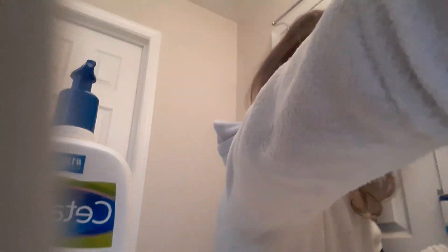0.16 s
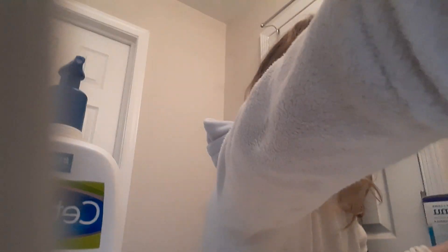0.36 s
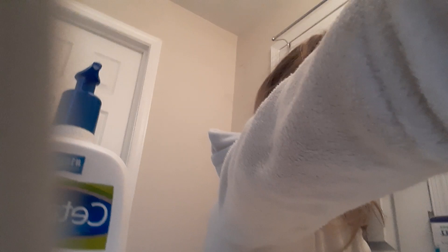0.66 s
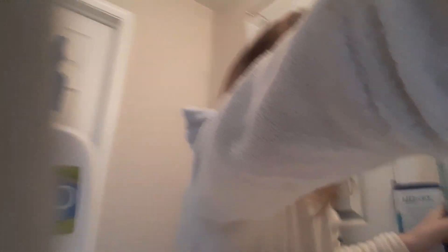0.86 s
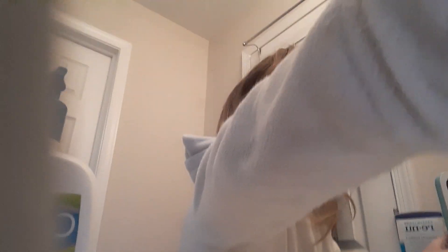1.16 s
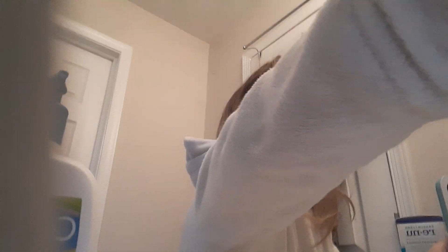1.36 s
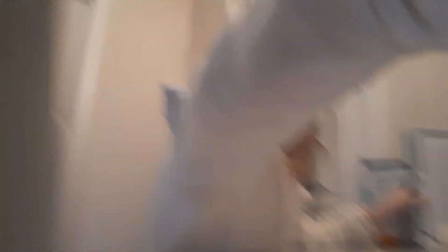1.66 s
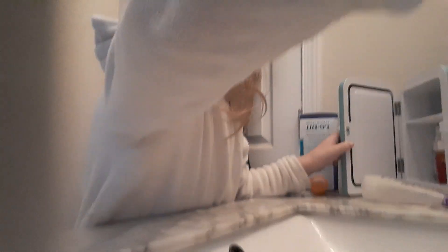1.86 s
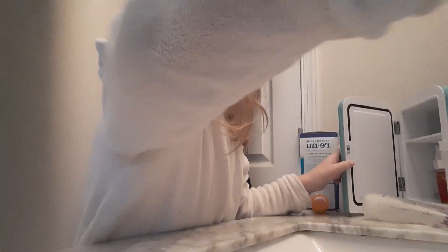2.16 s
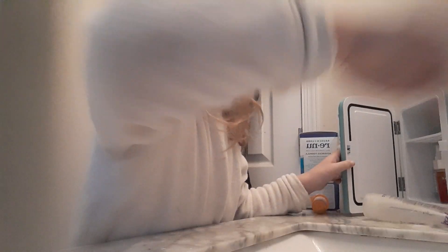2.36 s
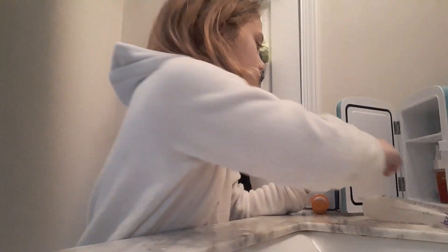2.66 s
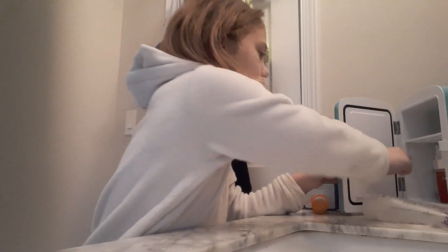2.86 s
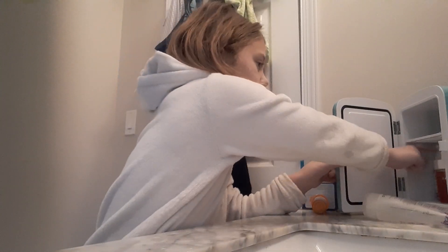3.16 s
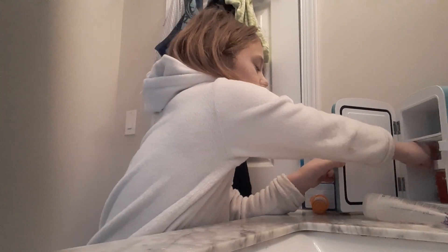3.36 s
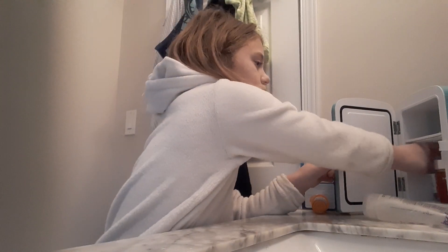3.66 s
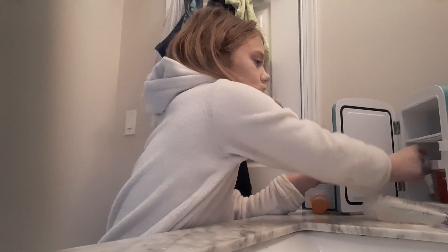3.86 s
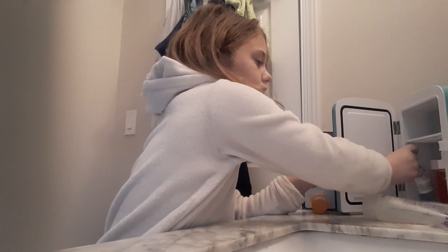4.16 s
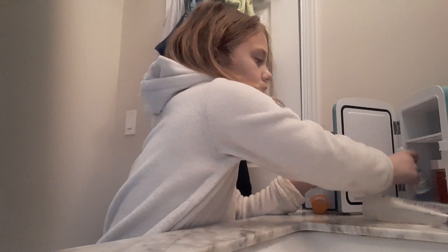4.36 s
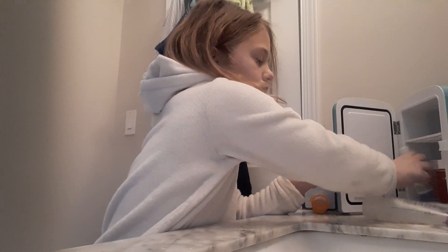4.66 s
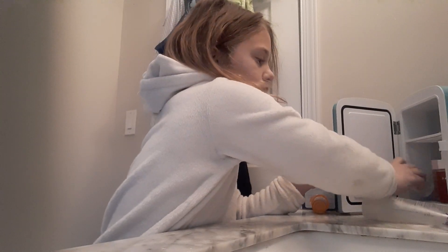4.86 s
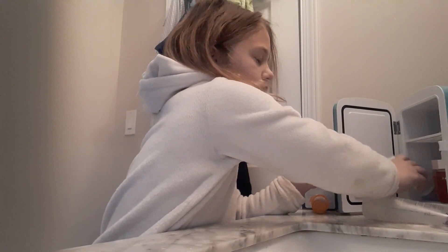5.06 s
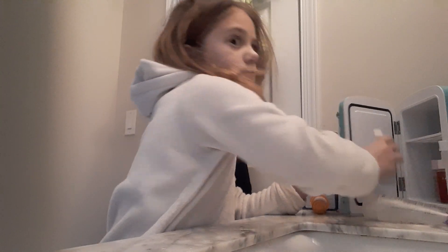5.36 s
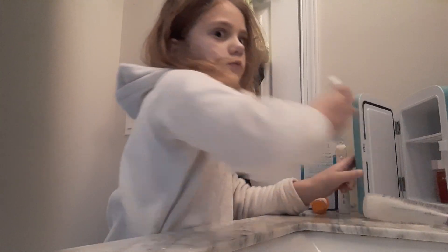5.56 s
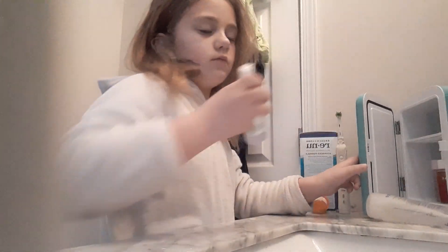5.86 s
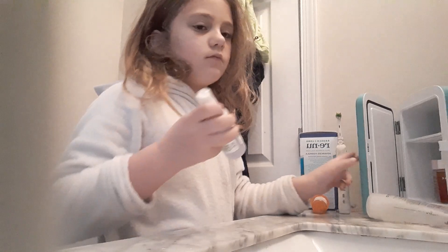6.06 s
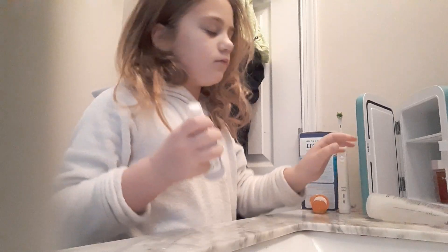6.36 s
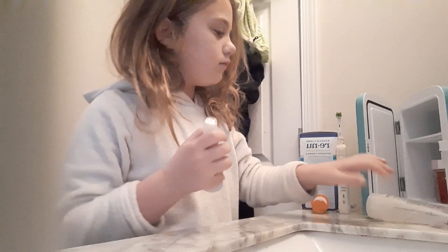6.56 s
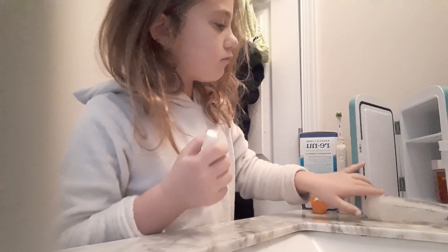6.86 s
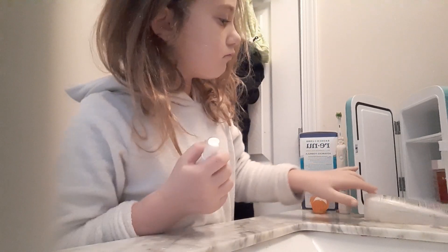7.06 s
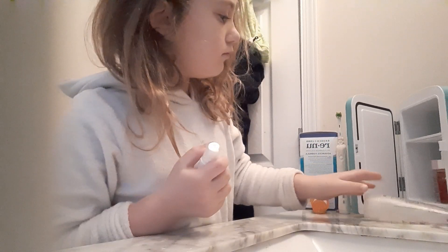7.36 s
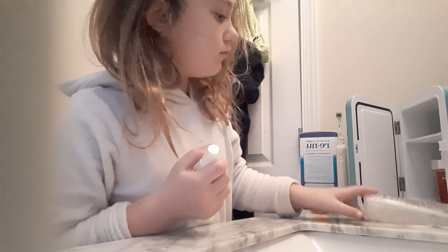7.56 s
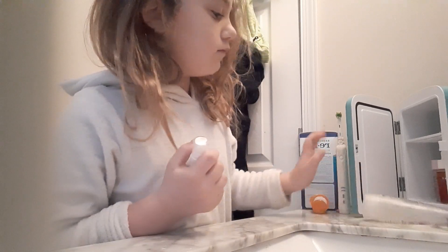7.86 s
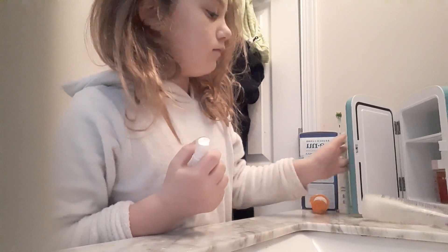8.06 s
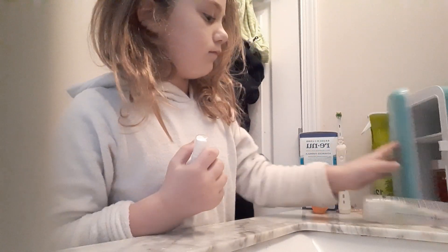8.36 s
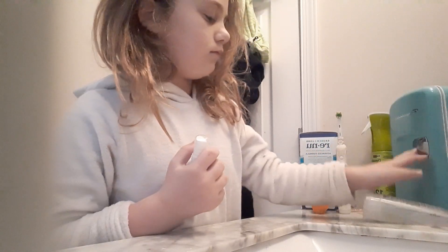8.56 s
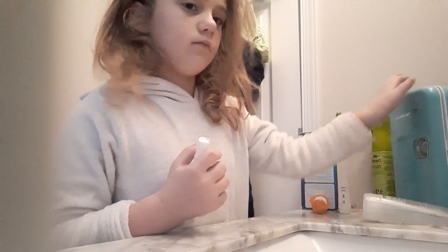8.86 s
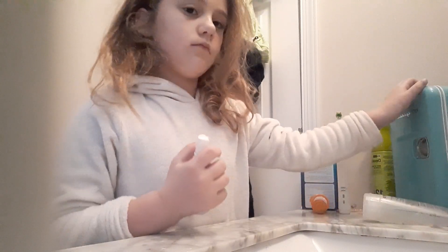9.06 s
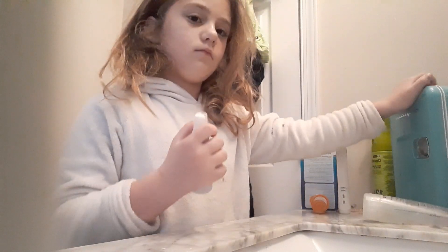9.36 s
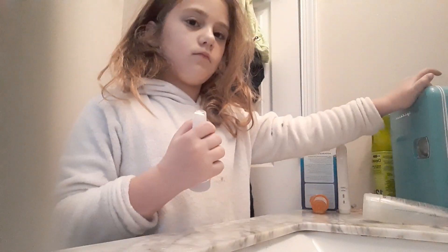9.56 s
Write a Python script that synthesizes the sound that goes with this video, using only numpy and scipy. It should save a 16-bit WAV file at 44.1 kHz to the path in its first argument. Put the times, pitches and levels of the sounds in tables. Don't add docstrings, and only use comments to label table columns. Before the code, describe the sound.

Close, dry handling clicks and skin rubs open the scene, ended by a sharp crack of the device on stone, by far the loudest sound. Then hollow plastic knocks come in separate clusters: a jar groped for, a tall bottle tipping, bottles pulled free with a snap. Quiet taps and gentle rocking lead to a low door thump and light lid taps, with short bright room reverberation and low fan noise.

```python
import sys
import numpy as np
from scipy import signal
from scipy.fft import rfft, irfft
from scipy.io import wavfile

SR = 44100
rng = np.random.default_rng(int(sys.argv[2]) if len(sys.argv) > 2 else 0)


def waveform_to_disk(signal):
    frames = np.transpose(np.atleast_2d(signal))
    scaled = np.clip(frames, -1, 1) * 32767
    samples = np.round(scaled).astype(np.int16)
    wavfile.write(sys.argv[1], SR, samples)


def elevation(decibels):
    levels = np.asarray(decibels, float)
    return 10 ** (levels / 20)


N = 428652

# (time [s], thud level [dB], thud pitch [Hz], knock level [dB], crack level [dB])
JAR_BLOWS = [(3.251, -37, 404, -52, -82), (3.29, -12.5, 434, -32, -55.5), (3.316, -36, 457, -43, -70),
             (3.333, -32, 420, -44, -69), (3.345, -34, 480, -36, -66), (3.356, -36, 453, -38, -66),
             (3.366, -30, 500, -43, -69), (3.375, -29, 420, -35.5, -56.5), (3.385, -38, 480, -44, -67),
             (3.395, -33, 405, -52, -75), (3.408, -17.5, 439, -41.5, -61.5), (3.519, -20, 433, -37, -61.5),
             (3.549, -32, 448, -45, -72), (3.578, -35, 440, -49, -81), (3.645, -42, 414, -51.5, -91),
             (3.69, -46, 399.5, -53, -82), (4.378, -22, 240, -38, -76), (4.428, -32, 338, -46.5, -83)]
PULL_BLOWS = [
    (5.35, -48, 298, -77, -92),
    (5.4355, -23, 447, -28, -50),
    (5.447, -34, 348, -31.5, -47),
    (5.459, -19, 452, -30, -47),
    (5.477, -15, 300, -17, -40),
    (5.488, -16, 428, -19, -42),
    (5.497, -20, 454, -29, -43),
    (5.509, -25.5, 454, -23.5, -57),
    (5.517, -20, 334, -32, -60),
    (5.539, -24.5, 221, -48, -60.5),
]
TIP_BLOWS = [
    (4.845, -18.5, 300, -34.5, -43),
    (4.869, -29, 280, -34.5, -52.5),
    (4.888, -21, 240, -32, -50),
    (4.897, -18, 282, -33, -48.5),
    (4.914, -27.5, 340, -35.5, -52),
    (4.94, -36, 260, -46, -62),
    (4.985, -36.5, 233, -52, -70),
]
SNAP_BLOWS = [
    (5.5665, -12.5, 370, -17.5, -27),
    (5.578, -18, 420, -22, -47),
    (5.590, -34, 387, -40, -55),
    (5.60, -29, 150, -46, -50),
    (5.609, -24.5, 363, -34, -49),
    (5.639, -26, 370, -40, -57),
    (5.679, -36, 451, -40.5, -69),
]
BUMP_BLOWS = [
    (8.205, -26, 420, -38, -52.5),
    (8.214, -23, 400, -20, -46.5),
    (8.223, -17.5, 398, -26.5, -61),
    (8.234, -24.5, 395, -44, -53),
    (8.268, -27, 348, -37, -56),
    (8.285, -29, 420, -52, -72),
    (8.305, -29, 386, -37, -68),
    (8.335, -47, 340, -51, -71),
    (8.40, -56, 402, -56, -65),
]
DOOR_BLOWS = [(8.496, -17, 250, -28, -35), (8.501, -11.5, 135, -27.5, -59), (8.525, -19.5, 324, -39, -55),
              (8.543, -17.5, 300, -26, -42.5), (8.551, -21, 154, -32, -67), (8.568, -20, 140, -28, -61),
              (8.6, -29, 250, -39, -71), (8.657, -50, 300, -43, -72), (8.71, -39, 420, -50, -69),
              (8.94, -46, 220, -58.5, -73), (8.953, -28, 137.5, -40, -55), (8.973, -31, 290, -52, -78),
              (9.075, -43, 275, -43, -86)]
LIGHT_BLOWS = [
    (6.126, -48, 459, -48.5, -79),
    (6.171, -28.5, 307.5, -64, -77),
    (6.9375, -13, 397, -29, -50.5),
    (6.97, -24.5, 321, -38, -60),
    (7.136, -32, 376, -50.5, -79),
    (7.509, -27.5, 372, -49.5, -70),
    (7.751, -24.5, 388, -41, -59),
]
LID_BLOWS = [
    (9.251, -47, 285, -35.5, -59.5),
    (9.331, -44, 290, -49, -64.5),
    (9.375, -32.5, 300, -37, -51.5),
    (9.387, -37, 656, -50, -70),
    (9.409, -44, 600, -60, -60),
    (9.453, -42, 298, -43, -62.5),
    (9.458, -54, 500, -42.5, -75),
    (9.482, -53, 500, -62, -77),
    (9.701, -26.5, 281, -30.5, -62.5),
]
TOUCH_BLOWS = [(2.512, -45.5, 500, -45, -82), (2.521, -41, 449, -54, -95), (2.533, -55, 398, -56.5, -82),
               (3.041, -40.5, 314, -44.5, -91), (3.7795, -31, 480, -38, -98), (3.786, -36, 324, -47, -96),
               (3.792, -39, 404, -60, -98), (3.80, -43, 452, -53, -100), (3.818, -43, 350, -52, -100),
               (3.838, -47, 552, -40, -91), (3.848, -45, 450, -52, -90), (3.878, -49, 319, -47, -94),
               (3.897, -56, 400, -52, -94), (4.21, -35, 212, -48, -103), (4.235, -31, 423, -50, -89)]

# (frequency [Hz], level [dB], decay time t60 [s]); first the jar
JAR_MODES = [(219.4, -1, 0.14), (300, -4, 0.13), (338, -1.5, 0.12), (428, -2, 0.06), (500, -11, 0.096),
             (563, 3.5, 0.032), (693, 2.5, 0.066), (1140, 0.5, 0.023), (1820, -23, .025),
             (2350, -28, 0.029)]
CABINET_MODES = [(218.4, 8, 0.227), (241.4, -5.5, 0.47), (318.5, -2.5, 0.25), (342.5, -3.5, 0.29),
                 (397, -21, 0.085), (420, 8, 0.086), (462.3, -3, 0.17), (598, -12.5, 0.19),
                 (707, -1.5, 0.11), (770, -0.5, 0.011), (960, -6.5, 0.024), (1120, -17, 0.12)]
TIP_MODES = [(228.4, -1, 0.16), (234, -1.5, 0.43), (319, -1.5, 0.119), (338, 0.5, 0.14), (442, 3.5, 0.089),
             (704, -4, 0.088), (867, -19, 0.045), (1306, -4.5, 0.03), (2690, -13, 0.021)]
BUMP_MODES = [(250, -2, 0.28), (342, -11.5, 0.16), (406, 3, 0.061), (480, -20, 0.096), (716, -6, 0.071),
              (970, -20, 0.037), (1880, -21, 0.02)]
DOOR_MODES = [(135, -12, 0.082), (160, -15, 0.08), (280, -7.5, 0.18), (322, 6.5, 0.051), (420, -5, 0.1),
              (495, -2.5, 0.14), (564, -5, 0.071), (668, -9.5, 0.058), (1100, -33, 0.044)]
TUBE_MODES = [(242, -12, 0.21), (318, 1.5, 0.052), (344, 6, 0.085), (455, -7, 0.081), (678, -10.5, 0.11),
              (872, -3.5, 0.031), (1390, -21, 0.025), (2070, -3.5, 0.01)]
LID_MODES = [(290, 1.5, 0.084), (340, 3, .1), (694, -17, 0.05), (1047, 6, 0.027), (2284, 4.5, 0.017),
             (3840, -8.5, 0.011)]
TOUCH_MODES = [(300, 9, 0.063), (424, 4, 0.069), (600, -1.5, 0.042), (1100, -9, 0.038), (1450, -34, .03)]

# (start [s], hold [s], scuff
# level [dB], hiss relative to scuff [dB])
SLIDES = [(1.738, 0.057, -44.5, -12), (3.016, 0.13, -64.5, -8), (3.274, 0.13, -45, -19.5),
          (3.453, 0.29, -70.5, -9), (3.76, 0.023, -69, -8), (3.897, 0.15, -65.5, -13),
          (4.197, .02, -58, -20), (4.351, 0.058, -67.5, -5.5), (5.554, .04, -47, -2),
          (4.927, 0.13, -60, -11), (5.085, 0.057, -71, 5), (5.152, 0.042, -61.5, -26),
          (8.211, 0.099, -44, -23), (8.337, 0.08, -63, -2), (8.486, 0.033, -38.5, -13.5),
          (8.924, 0.037, -46, -21), (9.041, 0.049, -58.5, -19), (9.273, .05, -56, -19),
          (9.36, 0.047, -49, -19), (9.518, 0.17, -83.5, -30.5)]
# (time [s], level [dB], pitch [Hz])
ROCKS = [(5.808, -43.5, 297), (5.987, -43.5, 290), (6.332, -42, 296.7), (6.491, -50, 323),
         (6.613, -42.5, 303), (6.749, -56, 330), (6.868, -46.5, 300), (7.267, -45, 320), (7.353, -51, 340),
         (7.427, -49, 324), (9.322, -46, 290), (9.437, -43, 300), (9.517, -44, 290), (9.623, -42, 280)]
# (time [s], level [dB], pitch [Hz])
BOOMS = [(1.7265, -22, 58.6), (4.85, -51.5, 77), (5.44, -45, 90), (5.572, -30, 101), (5.6, -43, 82.2),
         (6.94, -53.5, 60), (8.222, -42, 80.5), (8.25, -35.5, 76), (8.955, -47, 55), (9.1, -45, 50.2),
         (9.38, -57, 55)]
# (time [s], click level [dB], knock level [dB], length [ms])
TAPS = [(0.0014, -52, -47, 7.2), (0.0155, -32, -45, 2.4), (0.0225, -26, -22.5, 0.81),
        (0.027, -46, -45, 3.2), (0.036, -37, -46, 4.6), (0.042, -47, -59, 1.8), (0.2964, -42.5, -46.5, 2.5),
        (0.337, -57, -62, 2.4), (0.5, -56, -69, 1.4), (0.767, -57, -67, 2.1), (0.8703, -27, -38, 1.5),
        (0.878, -28, -26.5, 0.81), (0.882, -41, -49, 2.9), (0.893, -55, -52, 3.3), (0.904, -51, -58, 1.5),
        (0.911, -43, -42, 1.4), (0.962, -64, -56, 1.5), (0.974, -67, -66, 1.5), (0.994, -57, -68, 2),
        (1.2081, -57, -53.5, .88), (1.2888, -48, -49, 1.04), (1.358, -65, -51.5, 2.44),
        (1.377, -33, -44.5, 1.2), (1.409, -53, -48.5, 1.1), (1.445, -54.5, -52, 3),
        (1.505, -51.5, -54.5, 2.2), (1.5654, -56, -43.5, 1.9), (1.6326, -49.5, -59.5, 2.3),
        (1.6563, -46, -55.5, 1.9), (1.836, -42, -55, 1.5), (1.8487, -28, -39.5, 1.8),
        (1.854, -44, -47.5, 3.2), (1.861, -32.5, -35.5, 1.45), (1.92, -51, -52.5, 1.4),
        (2.0878, -57, -53, 2.9), (2.0957, -49, -61, 4.2), (2.1016, -59, -44, 4.4)]
LANDING = [(1.688, -52.5, -57, 2.3), (1.705, -43.5, -57, 2.6), (1.7135, -48, -63, 1.2), (1.722, 1, -12, 1),
           (1.728, -19, -34, 1.4), (1.7306, -25.5, -33.5, 7.2), (1.7346, -26, -36, 1.3),
           (1.7592, -14, -24.5, 0.8), (1.7602, -3, -26.5, 1.4), (1.7622, -12, -30.5, 1.1),
           (1.7641, -12.5, -32, 1.1), (1.768, -29, -39, 8.5)]
# (level [dB], frequency [Hz], t60 [s])
PORT_PING = (-1, 8800, .006)
# (time [s], level [dB], length [ms])
JOLTS = [(.0014, -43, 0.91), (0.014, -47.5, 1.2), (0.0223, -38, 1.2), (0.0352, -53, 1.2),
         (0.8698, -52.5, 3.1), (0.8811, -43.5, 3.3), (0.899, -61, 4), (0.915, -55, 4.8),
         (1.7227, -11.5, 0.56), (1.7613, -25.5, 0.59), (1.8473, -54.5, 1.7), (2.096, -67, 0.94),
         (3.29, -51, 1), (4.846, -58, 1.2), (5.568, -47, 1.5)]
# (start [s], hold [s], hiss level [dB], dull part relative to hiss [dB])
RUBS = [(-.03, 0.023, -44, -7), (0.106, .16, -60.5, 6), (0.252, 0.031, -65, -8), (0.562, 0.12, -64.5, 0),
        (0.717, 0.26, -67, -8), (0.997, 0.42, -71, -1), (1.285, 0.13, -67.5, -2.5),
        (1.447, 0.18, -63.5, -7), (1.63, 0.09, -60.5, -6), (1.76, 0.155, -80, 8.5), (2.06, 0.019, -73, 12)]

# (frequency [Hz], level [dB per Hz])
CRACK_COLOUR = [(2000, -32), (3200, -6.5), (4600, -2), (7000, -8.5), (9000, 8.5), (11000, -1), (15500, -3),
                (16500, -42)]
PORT_COLOUR = [(1760, -30), (2800, -14), (3340, 3), (4000, -6.5), (5700, -7), (7060, -13), (8870, 2.5),
               (10500, -0.5), (14100, -4.5), (15900, -14.5), (16500, -41)]
STONE_COLOUR = [(1300, -19), (2000, -12.5), (6000, -9.5), (7400, -7), (8700, -1), (10200, -14),
                (15500, -9.5), (16500, -40)]
# (band centre [Hz], level [dB], t60 [s])
ROOM_BANDS = [(140, -11, 0.23), (324, -10, 0.34), (533, -8, 0.34), (750, -9, .34), (1270, -11, 0.14),
              (1860, -8.5, 0.43), (2550, -12, 0.38), (3376, -4.5, .33), (4773, -15, 0.57),
              (6040, -0.5, 0.36), (9030, -20, 0.49), (12730, -5, 0.26)]
# (frequency [Hz], level [dB per Hz])
AIR_COLOUR = [(20, -49), (50, -21.5), (107, -7.5), (197, -13), (245, -9.5), (368, -13.5), (440, -7.5),
              (660, -13.5), (760, -9.5), (950, -17), (1290, -22), (2200, -31.5), (2700, -39), (4000, -56)]
# (frequency [Hz], rms level [dB])
FAN_TONES = [(118.4, -74), (253.0, -73), (339.1, -73.5), (473.7, -72.5), (576.0, -78), (764.4, -69),
             (1077, -90), (1270, -75.5), (1453, -83.5), (1890, -86)]
# (time [s], level [dB])
FAN_COURSE = [(0, -50.5), (.4, -54.5), (1.3, -55), (1.75, -52.5), (1.95, -60), (3.0, -58.5), (3.6, -52),
              (4.3, -54), (5.3, -56), (5.9, -55), (6.7, -55.5), (7.3, -54.5), (8.1, -54), (8.8, -56),
              (9.72, -51)]
# (frequency [Hz], level [dB per Hz])
HISS_COLOUR = [(1760, -49.5), (3000, -13), (3510, -9), (3850, -12), (7160, -10), (9800, -3.5),
               (16500, -9.5)]


def level(x, db=0):
    return x * elevation(db) / np.sqrt(np.mean(x ** 2))


def noise():
    return rng.standard_normal(N)


def colour(points, size=N):
    hz, db = np.transpose(points)
    log_f = np.log(np.arange(size // 2 + 1) * SR / size + 1)
    spectrum = rfft(rng.standard_normal(size)) * elevation(np.interp(log_f, np.log(hz), db))
    return level(irfft(spectrum, size))


def butter(x, order, hz, kind="low"):
    return signal.sosfilt(signal.butter(order, hz, kind, fs=SR, output="sos"), x)


def band(x, lo_hz, hi_hz):
    return butter(x, 2, [lo_hz, hi_hz], "band")


def ring(x, hz, t60):
    r, w = np.exp(-np.log(1000) / (t60 * SR)), 2 * np.pi * hz / SR
    return signal.lfilter([np.sin(w)], [1, -2 * r * np.cos(w), r * r], x)


def add(out, s, piece):
    i = int(s * SR)
    out[i:i + len(piece)] += piece[:len(out) - i]


def bursts(times, dbs, lengths, rise=0.0003):
    out, t = np.zeros(N), np.arange(SR // 16) / SR
    for s, db, length in zip(times, dbs, lengths):
        add(out, s, elevation(db) * (1 - np.exp(-t / rise)) * np.exp(-t / max(length, 1e-4)))
    return out


def strokes(starts, holds, dbs, rise_s, fade_s):
    out, t = np.zeros(N), np.arange(N) / SR
    for s, hold, db in zip(starts, holds, dbs):
        part = slice(max(int(s * SR), 0), int((s + hold + 0.4) * SR))
        age = t[part] - s
        swell = np.clip(age / rise_s, 0, 1) ** 2
        out[part] += elevation(db) * swell * np.exp(-np.maximum(age - rise_s - hold, 0) / fade_s)
    return out


def along(rows):
    s, db = np.transpose(rows)
    return elevation(np.interp(np.arange(N) / SR, s, db))


def blows(rows, modes, clack_over_db, ring_db, thud_s, chatter_s, clack_hz, beat_hz=0):
    s, db, hz, knock_db, crack_db = np.transpose(rows)
    s, modes, lengths = s + 0.0015, np.array(modes), np.full(len(s), chatter_s)
    t = np.arange(SR // 8) / SR
    variation = rng.standard_normal((len(s), len(modes)))
    lag = chatter_s * rng.random(variation.shape)
    start, stop = int(s.min() * SR), min(int(s.max() * SR) + SR // 2, N)
    drive, out = np.zeros((len(modes), stop - start)), np.zeros(N)
    for k in range(len(s)):
        octaves = np.log2(modes[:, 0] / hz[k])
        near = elevation(db[k] - 12) / (1 + (octaves / 1.02) ** 2)
        share = np.where(modes[:, 0] < 600, near, elevation(knock_db[k] + 3.0))
        share = share * elevation(ring_db + modes[:, 1] + 2.0 * variation[k])
        for m in range(len(modes)):
            add(drive[m], s[k] + lag[k, m] - start / SR, share[m:m + 1])
        envelope = (1 - np.exp(-t / 0.00024)) * np.exp(-t / thud_s) * np.cos(np.pi * beat_hz * t)
        add(out, s[k], elevation(db[k] + 2.0) * envelope * np.sin(2 * np.pi * hz[k] * t))
    out[start:stop] += sum(ring(d, f, t60) for d, (f, _, t60) in zip(drive, modes))
    knock = bursts(s, knock_db, lengths) * level(band(noise(), 683, 1196))
    clack_noise = band(noise(), clack_hz / 1.5, clack_hz * 1.147)
    clack_noise = level(band(clack_noise, clack_hz / 2.0, clack_hz * 2.65))
    clack = bursts(s, crack_db + clack_over_db - 0.5, 0.63 * lengths) * clack_noise
    crack = bursts(s, crack_db + 4.5, lengths) * colour(CRACK_COLOUR)
    return out + knock + clack + crack


def knocks(rows, modes, room_db, low_hz, top_hz=16000, **blow):
    dry = butter(blows(rows, modes, **blow), 4, low_hz, "high")
    dry = butter(dry, 2, min(top_hz, SR / 2.2))
    return np.array([dry, elevation(room_db) * dry])


def jar():
    return knocks(JAR_BLOWS, JAR_MODES, room_db=0.0, low_hz=143.8, clack_hz=2030, clack_over_db=25.0,
                  ring_db=-2.5, thud_s=0.0094, chatter_s=0.004, beat_hz=33.27)


def pulled_bottles():
    return knocks(PULL_BLOWS, CABINET_MODES, room_db=0.5, low_hz=137, clack_hz=2220, clack_over_db=15,
                  ring_db=3.0, thud_s=0.011, chatter_s=0.0069)


def tipped_bottle():
    return knocks(TIP_BLOWS, TIP_MODES, room_db=0.5, low_hz=150, clack_hz=2330, clack_over_db=13.5,
                  ring_db=2.0, thud_s=0.0083, chatter_s=0.0072)


def snapping_bottle():
    return knocks(SNAP_BLOWS, CABINET_MODES, room_db=-1.0, low_hz=127, clack_hz=2310, clack_over_db=9,
                  ring_db=0.0, thud_s=0.0078, chatter_s=0.0035)


def door_bump():
    return knocks(BUMP_BLOWS, BUMP_MODES, room_db=1.5, low_hz=150, clack_hz=2090, clack_over_db=14.5,
                  ring_db=7.5, thud_s=0.01, chatter_s=0.00604)


def door_shut():
    return knocks(DOOR_BLOWS, DOOR_MODES, room_db=2.0, low_hz=98.0, clack_hz=2240, clack_over_db=12.5,
                  ring_db=6.0, thud_s=0.0063, chatter_s=0.00548)


def light_knocks():
    return knocks(LIGHT_BLOWS, TUBE_MODES, room_db=5.0, low_hz=133.8, clack_hz=1620, clack_over_db=5,
                  ring_db=-2.0, thud_s=0.0036, chatter_s=0.0054)


def lid_taps():
    return knocks(LID_BLOWS, LID_MODES, room_db=2.0, low_hz=140, clack_hz=2200, clack_over_db=16.0,
                  ring_db=-14.5, thud_s=0.0066, chatter_s=0.0045)


def shelf_touches():
    return knocks(TOUCH_BLOWS, TOUCH_MODES, room_db=-1, low_hz=158.0, top_hz=2260, clack_hz=1540,
                  clack_over_db=28.5, ring_db=-1.0, thud_s=0.0036, chatter_s=0.0089)


def grit(rate, spread_db):
    sizes = elevation(spread_db * np.minimum(rng.exponential(size=N), 2))
    grains = (rng.random(N) < rate / SR) * sizes
    return level(1 + signal.lfilter([1], [1, -np.exp(-1 / (0.00078 * SR))], grains))


def friction(hiss, dull, rate, spread_db):
    middle = level(band(band(noise(), 1198.6, 1900), 1000, 2883))
    return grit(rate, spread_db) * (hiss * colour(PORT_COLOUR) + dull * middle)


def sliding():
    s, hold, db, hiss_db = np.transpose(SLIDES)
    body = strokes(s, hold, db, rise_s=0.031, fade_s=0.029)
    hiss = strokes(s, hold, db + hiss_db, rise_s=0.031, fade_s=0.029)
    scuff = grit(rate=120, spread_db=3.0) * level(band(noise(), 270.4, 1000))
    return friction(hiss, elevation(-2.5) * hiss, rate=180, spread_db=2.5) + body * scuff


def soft_taps(rows, rise_s, fade_s):
    out, t = np.zeros(N), np.arange(SR // 8) / SR
    for s, db, hz in rows:
        envelope = (1 - np.exp(-t / rise_s)) * np.exp(-t / fade_s)
        add(out, s, elevation(db) * envelope * np.sin(2 * np.pi * hz * t))
    return out


def rocking():
    return elevation(13) * soft_taps(ROCKS, rise_s=0.0038, fade_s=0.0062)


def counter_booms():
    return elevation(1.5) * soft_taps(BOOMS, rise_s=0.017, fade_s=0.0235)


def contacts(rows, click_colour, clack_under_db):
    s, db, knock_db, length_ms = np.transpose(rows)
    length = length_ms / 1000
    clack_db = (db + knock_db) / 2 + clack_under_db
    click = bursts(s, db - 2.5, length, rise=0.00018) * colour(click_colour)
    case = level(band(noise(), 1300, 2800) + 0.76 * band(noise(), 2400, 3900))
    clack = bursts(s, clack_db + 4.0, length) * case
    knock = bursts(s, knock_db + 4, 2.33 * length) * level(band(noise(), 115.5, 980))
    return click + clack + knock


def port_ping():
    db, hz, t60 = PORT_PING
    out, t = np.zeros(N), np.arange(SR // 50) / SR
    envelope = (1 - np.exp(-t / 0.00036)) * np.exp(-np.log(1000) * t / t60)
    add(out, 1.7597, elevation(db + 6) * envelope * np.sin(2 * np.pi * hz * t))
    return out


def jolts():
    s, db, length_ms = np.transpose(JOLTS)
    kick = bursts(s, db, length_ms / 1000)
    return elevation(19.0) * kick - elevation(-29) * ring(kick, 45, 0.11)


def handling():
    fingers = contacts(TAPS, PORT_COLOUR, clack_under_db=-3.5)
    landing = contacts(LANDING, STONE_COLOUR, clack_under_db=-6) + port_ping()
    return fingers + landing + jolts()


def rubbing():
    s, hold, db, dull_db = np.transpose(RUBS)
    hiss = strokes(s, hold, db, rise_s=0.029, fade_s=0.014)
    dull = strokes(s, hold, db + dull_db, rise_s=0.029, fade_s=0.014)
    return friction(hiss, dull, rate=240, spread_db=3.5)


def room(x):
    t = np.arange(SR // 2) / SR
    tail = 0
    for hz, db, t60 in ROOM_BANDS:
        part = band(rng.standard_normal(len(t)), hz / 1.25, hz * 1.22)
        part = part * np.exp(-np.log(1000) * t / t60) * np.clip(t / 0.0025, 0, 1)
        tail = tail + elevation(db) * part / np.sqrt(np.sum(part ** 2) * SR / hz) * 1.856
    return signal.fftconvolve(x, tail)[:N]


def fan():
    t = np.arange(N) / SR
    wander = np.cumsum(noise()) * 0.00002
    tones = 0
    for hz, db in FAN_TONES:
        tones = tones + elevation(db + 4.0) * np.sin(2 * np.pi * hz * (t + wander / np.sqrt(hz)))
    return along(FAN_COURSE) * (elevation(-2.5) * colour(AIR_COLOUR) + elevation(57.5) * tones)


def self_noise():
    return elevation(-78) * colour(HISS_COLOUR)


def scene():
    bottles = jar() + pulled_bottles() + tipped_bottle() + snapping_bottle()
    door = door_bump() + door_shut()
    direct, to_room = bottles + door + light_knocks() + lid_taps() + shelf_touches()
    soft = sliding() + rocking() + counter_booms()
    near = handling() + elevation(-4.0) * rubbing()
    reverberation = room(to_room) + room(elevation(-3.5) * soft + elevation(-22.5) * near)
    return (direct + soft + near + reverberation + fan() + self_noise())[None]


def top_cut(x):
    return signal.sosfilt(signal.butter(12, 17060, fs=SR, output="sos"), x)


def record(dry):
    x = butter(dry, 1, 35, "high")
    mix = np.tanh(0.71 * x) / 0.91
    return top_cut(mix)


dry = scene()
out = record(dry)
waveform_to_disk(out)
```